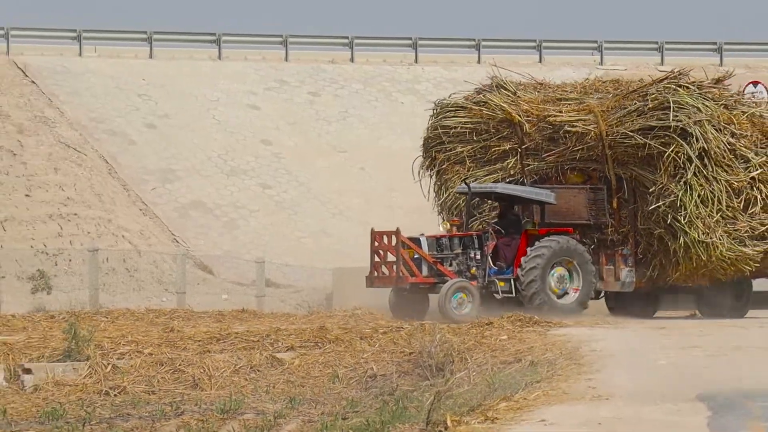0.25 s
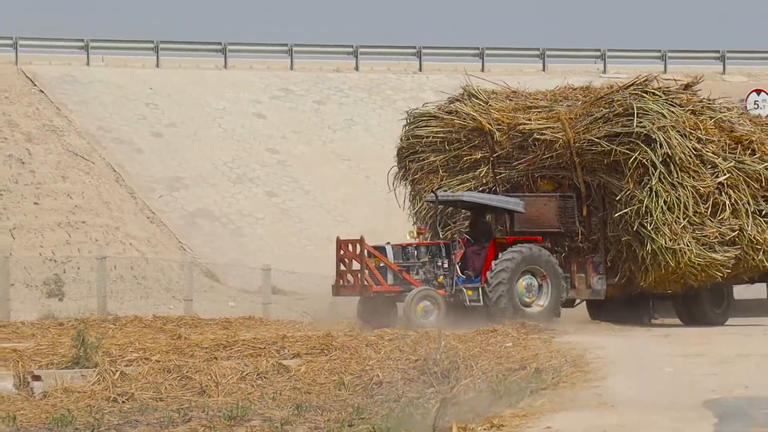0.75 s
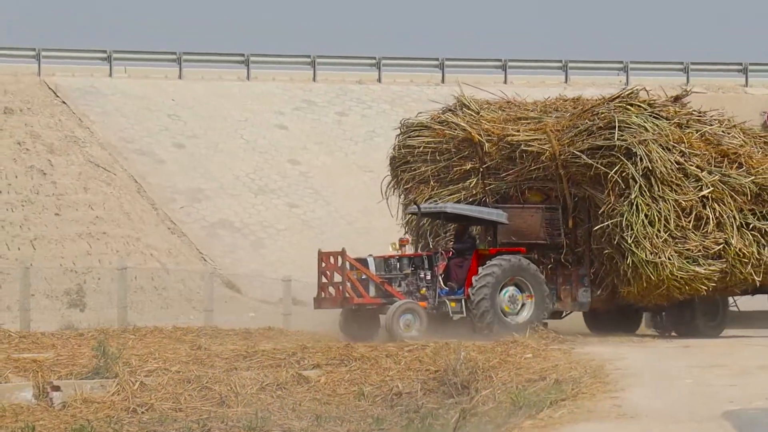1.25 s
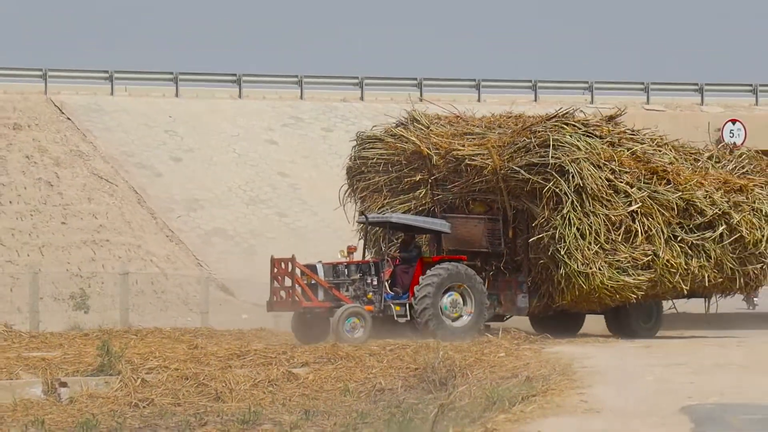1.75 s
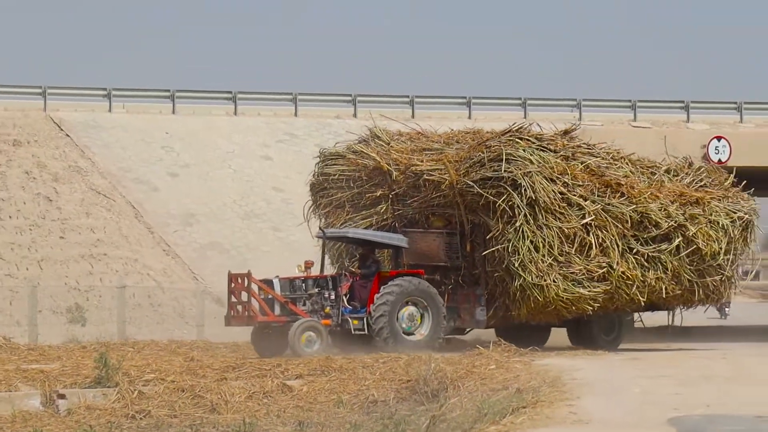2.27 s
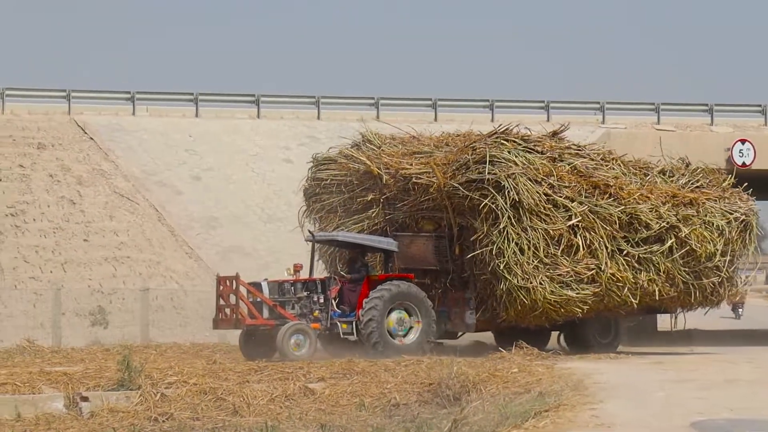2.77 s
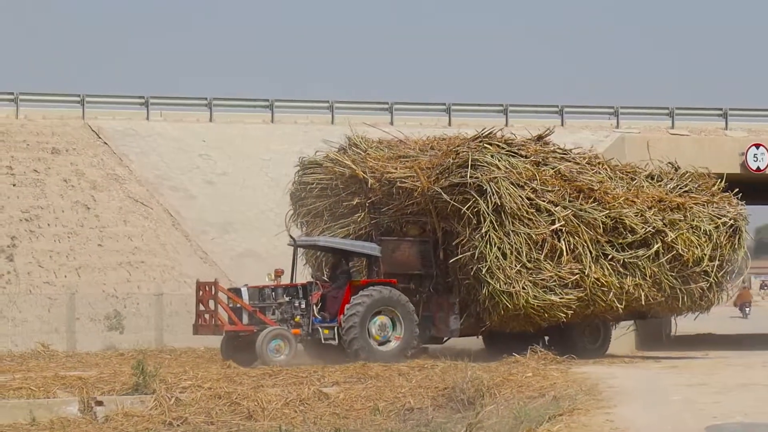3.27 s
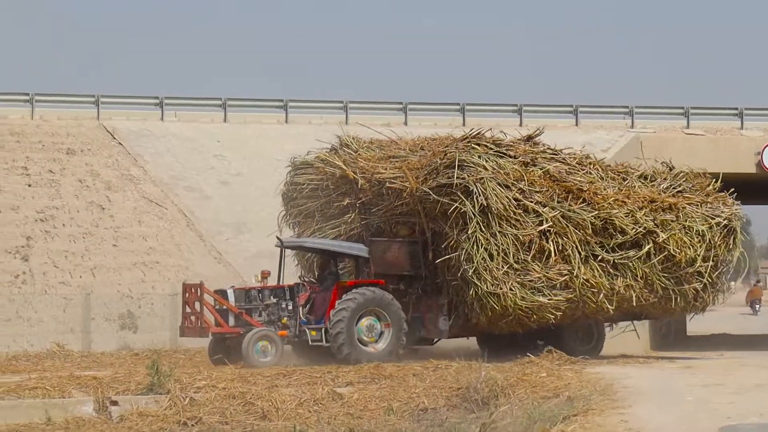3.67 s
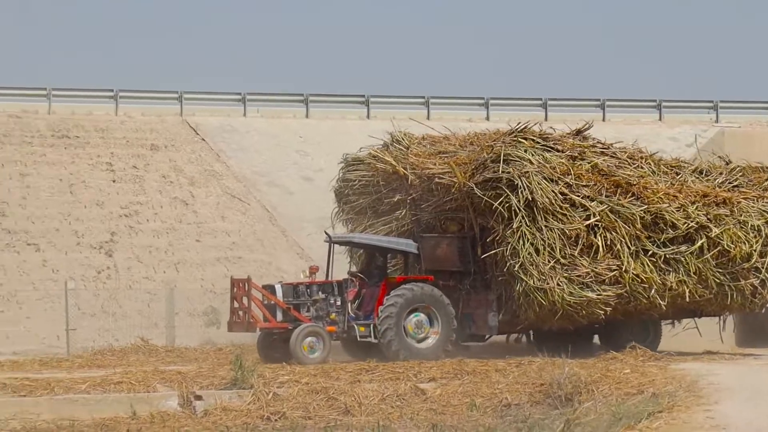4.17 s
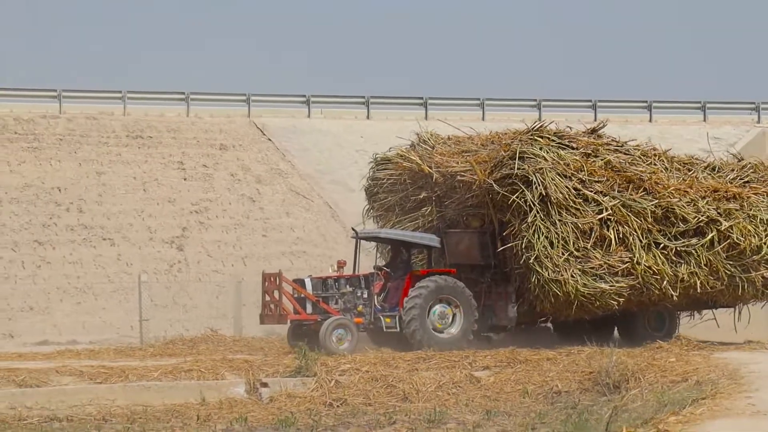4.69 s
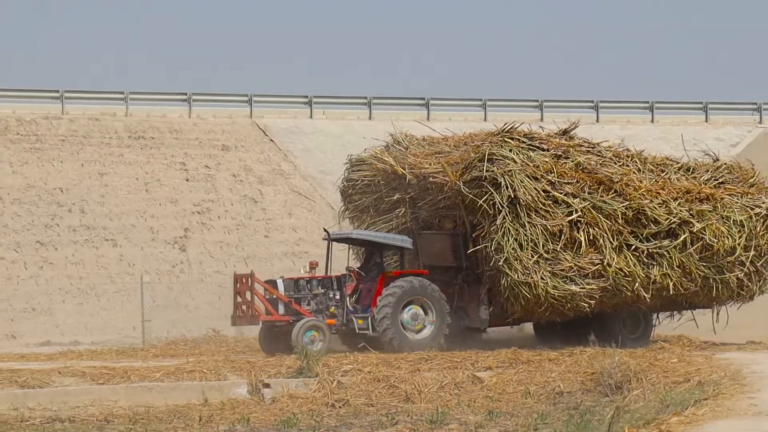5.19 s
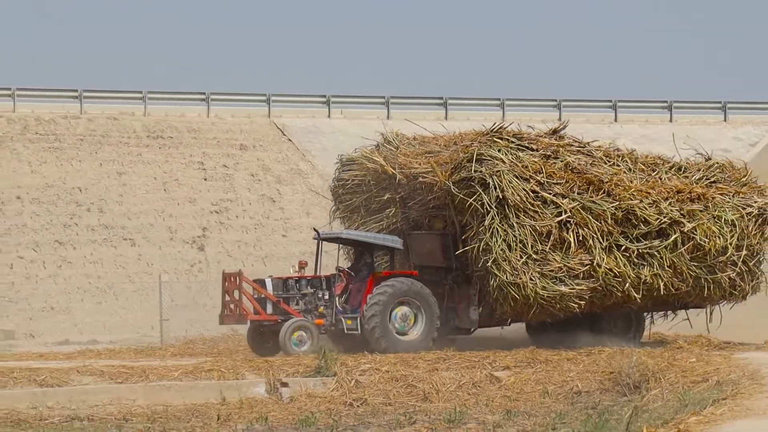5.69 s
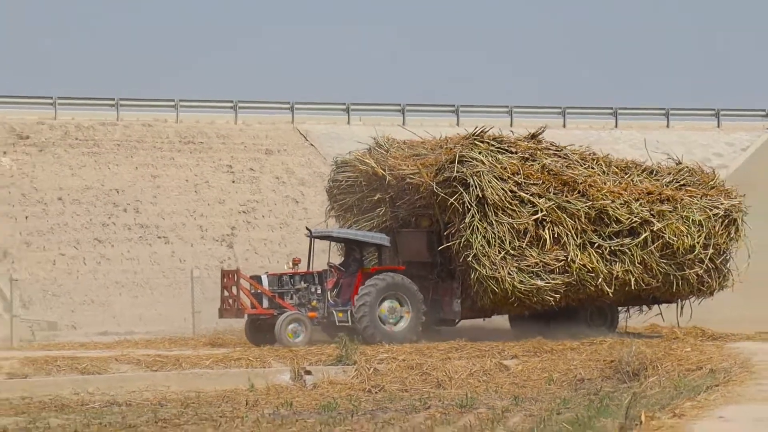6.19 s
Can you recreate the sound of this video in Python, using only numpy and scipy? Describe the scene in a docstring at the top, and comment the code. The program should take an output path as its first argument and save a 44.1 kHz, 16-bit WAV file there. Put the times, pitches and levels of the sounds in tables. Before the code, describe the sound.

An open dirt road beside an embankment, heard through a close stereo microphone battered by wind. From the start a diesel tractor under load chugs at a distance: quick, slightly uneven, muffled pulses with a short slap of echo and a low roll beneath. Hard metallic clacks from its engine fade within the first second. Low wind flutters constantly, with blunt thuds and slaps, strongest near 0.4, 1.1, 2.1, 3.2, 3.9, 4.6 and 5.1 seconds; some crack with overload and duck everything. The wind lulls briefly around 3. From about 3.3 a small motorbike emerges, its bright chain hiss and clatter swelling to a very close pass near 4.3, with snapping grit, tyre swish and sharp metallic ticks. It recedes with a low, rapid exhaust putter and ringing valve ticks, which grow after 5.4 as the throttle opens. Faint, dry airy hiss remains behind; the tractor keeps chugging to the end, about 6.4.

```python
"""A dirt road below an embankment, where a diesel tractor hauling a loaded trolley is heard from a distance.
The tractor is uneven firing pulses and puffs with an echo, ringing clacks and a low roll of noise.
A small single-cylinder engine, likely a motorbike, hisses close by after four seconds and putters away:
beamed noise layers that pass, exhaust puffs, ringing valves, gritty tyres and short metallic ticks.
Wind flutters and slaps on the microphone as noise and short eddies, and its limiter ducks; far off, dry air hisses."""
import sys
import numpy as np
from scipy import signal
from scipy.fft import rfft, irfft
from scipy.io import wavfile
from scipy.ndimage import uniform_filter1d, minimum_filter1d

SR = 44100
rng = np.random.default_rng(int(sys.argv[2]) if len(sys.argv) > 2 else 0)


def transcribe(u):
    """Save the signal u as a 16-bit wav file named by the first command-line argument.

    u: samples, shape (n,) or (channels, n), limited to [-1, 1]; the rate is SR.
    q: integer samples, one column per channel.
    """
    v = np.clip(np.atleast_2d(u).T, -1, 1)
    q = np.round(v * 32767).astype(np.int16)
    wavfile.write(sys.argv[1], SR, q)


N = 284268
TIME = np.arange(N) / SR  # s
EDDY_TIME = np.arange(-256, 257) / SR  # s, zero at the middle of an eddy

TRACTOR_FIRING_HZ = 58.22
# The motorbike's pass: when it is nearest, how near, and how fast.
PASS_S, NEAREST_M, SPEED_M_PER_S = 4.287, 1.8, 6.3

# Flurries of eddies at the microphone.
# Each row: start in seconds, length in seconds, relative level in dB, centre in Hz.
FLURRIES = [(0.029, 0.061, -17.5, 690), (0.209, 0.019, -17.5, 850), (0.351, 0.0049, -16.5, 830),
            (0.394, 0.028, -14, 1000), (0.43, 0.057, -22, 860), (0.61, 0.017, -22, 960),
            (0.628, 0.027, -14, 820), (0.726, 0.051, -18, 490), (0.773, 0.019, -15, 970),
            (0.861, 0.0055, -21.5, 800), (1, 0.018, -21, 620), (1.061, 0.036, -16, 990),
            (1.112, 0.018, -12, 720), (1.143, 0.023, -16.5, 770), (1.172, 0.0082, -7.5, 1030),
            (1.218, 0.021, -15.5, 890), (1.271, 0.015, -13, 930), (1.341, 0.022, -21.5, 820),
            (1.426, 0.027, -17, 1060), (1.574, 0.029, -19.5, 830), (1.813, 0.0094, -14.5, 1010),
            (1.923, 0.021, -15.5, 890), (2.013, 0.0048, -15.5, 920), (2.089, 0.0078, -16.5, 1060),
            (2.118, 0.029, -15.5, 945), (2.197, 0.0046, -15, 850), (2.29, 0.017, -16, 1040),
            (2.336, 0.038, -23.5, 700), (2.546, 0.013, -18.5, 600), (2.627, 0.033, -18, 660),
            (2.92, 0.017, -24, 760), (2.952, 0.021, -20.5, 790), (3.201, 0.02, -15.5, 760),
            (3.233, 0.0048, -10, 810), (3.342, 0.015, -17.5, 710), (3.39, 0.0054, -19.5, 900),
            (3.447, 0.0082, -16, 670), (3.592, 0.0052, -18.5, 736), (3.611, 0.0064, -17.5, 824),
            (3.694, 0.0066, -21, 800), (3.919, 0.034, -14, 1040), (4.07, 0.006, -39, 790),
            (4.199, 0.031, -26.5, 710), (4.238, 0.032, -17, 764), (4.355, 0.017, -16.5, 810),
            (4.46, 0.033, -20, 910), (4.524, 0.012, -17, 830), (4.551, 0.01, -13.5, 1200),
            (4.565, 0.021, -14, 1010), (4.6, 0.033, -19, 724), (4.62, 0.038, -13, 1100),
            (4.697, 0.0071, -16.5, 880), (4.724, 0.023, -20.5, 960), (4.82, 0.0047, -22, 1230),
            (5.041, 0.074, -18.5, 760), (5.549, 0.0082, -19, 620), (5.804, 0.014, -12, 540),
            (5.86, 0.028, -17, 670), (6.017, 0.031, -23.5, 850), (6.244, 0.018, -18, 570),
            (6.316, 0.0049, -17, 764), (6.398, 0.02, -14, 664)]
# The steady wind, with a lull near three seconds. Each row: time in seconds, relative level in dB.
STEADY_WIND = [(0, -29.5), (0.55, -36.5), (0.8, -31), (1.3, -27), (1.85, -25.5), (2.15, -31.5),
               (2.55, -26.5), (2.98, -32.5), (3.07, -47), (3.28, -25.5), (3.75, -36.5), (4.0, -23),
               (4.65, -24), (4.92, -28), (5.2, -23), (5.85, -24), (6.45, -26.5)]


def tractor(level_db=-37, rough=0.54, knock_s=0.0039, echo_db=-5, echo_s=.047):
    """Four uneven cylinders fire a pulse and a puff each; the embankment throws them back."""
    # Exhaust and block. Each row: frequency in Hz, relative density in dB per Hz.
    spectrum = [(30, -37), (60, -14), (110, 0.5), (350, -6.5), (520, -4.5), (800, -11.5), (1150, -13.5),
                (1370, -7.5), (1600, -15), (2200, -23.5), (2700, -18.5), (4500, -30.5), (8000, -39.5),
                (14000, -70)]
    firings = np.cumsum(TRACTOR_FIRING_HZ * (1 + .008 * wander(2))) / SR
    cylinder = gain_of(np.array([4.0, -1.5, 3.5, -2.0]))[firings.astype(int) % 4]
    pulses = np.diff(np.floor(firings), prepend=0) * cylinder * gain_of(0.51 * wander(40))
    age_s = (firings % 1) / TRACTOR_FIRING_HZ
    puffs = noise() * cylinder * (0.4 + np.exp(-age_s / knock_s))
    # hood and load smear each pulse
    scatter = rng.standard_normal(900) * np.exp(-np.arange(900) / 260)
    pulses = signal.oaconvolve(pulses, scatter)[:N]
    direct = coloured((1 - rough) * evened(pulses) + rough * evened(puffs), spectrum)
    echo = gain_of(echo_db) * np.roll(direct, round(echo_s * SR), 1)
    return gain_of(level_db + wander(0.33)) * evened(direct + echo)


def knock(weak_db=-15, decay_s=0.0021, uneven_db=2):
    """Injection clacks ring the engine block, strong and weak by turns."""
    # The clack fades as the tractor turns side on. Each row: time in seconds, level in dB.
    level_rows = [(0, -44), (.11, -42.5), (.2, -39.5), (.29, -41), (.35, -53), (.55, -46), (.66, -39.5),
                  (.72, -42), (.85, -59), (3, -61), (6.45, -74)]
    # Ring of the block. Each row: frequency in Hz, relative level in dB, time to fall 60 dB in seconds.
    modes = [(836, -17, .02), (1380, 2.5, 0.012), (1920, 5, 0.012), (2200, 5.5, 0.0097), (2810, -1, .022),
             (3100, -6, 0.033), (3500, -7, 0.038), (3750, -4, 0.025), (5100, -21, 0.0052),
             (6250, -10, 0.0031)]
    firings = TRACTOR_FIRING_HZ * TIME + 1.25 + .05 * wander(20)
    age_s = (firings % 1) / TRACTOR_FIRING_HZ
    blow_db = weak_db * (firings.astype(int) % 2) + uneven_db * wander(25)
    blows = np.exp(-age_s / decay_s) * gain_of(blow_db)
    tone = [(4000, -4), (7000, -2), (10000, -18), (15000, -40)]
    return gain_of(curve(level_rows)) * coloured(rung(noise() * blows, modes), tone)


def rumble(level_db=-51):
    """The low, even roll of the tractor and its load, as shaped noise."""
    spectrum = [(20, -18), (42, -6), (65, -6), (100, -3), (200, -19), (1000, -69)]
    return gain_of(level_db) * coloured(noise(), spectrum)


def motorbike(rattle_db=1.5, uneven_db=1.3, aside_db=2, near_db=4, stones_db=3):
    """Every firing gives an exhaust puff and a valve tick, and jerks the hissing chain."""
    # Each row: time in seconds, firing rate in Hz.
    rate_rows = [(0, 29), (2.6, 28.6), (3.3, 27.6), (3.8, 26.6), (4.3, 25.2), (4.8, 24.6), (5.3, 24.4),
                 (5.8, 24.6), (6.1, 25), (6.45, 25)]
    rate_hz = curve(rate_rows)
    cycles = np.cumsum(rate_hz) / SR + .09
    age_s = (cycles % 1) / rate_hz
    strength = gain_of(uneven_db * wander(4.9))
    exhaust = muffler(cycles, age_s, strength)
    hiss = chain(cycles)
    # Clatter of the engine. Each row: frequency in Hz, relative density in dB per Hz.
    clatter_spectrum = [(600, 12), (1600, 5), (2800, 8.5), (3700, 3.5), (4600, -14), (6400, -7.5),
                        (8000, -24), (9500, -18.5), (12000, -34), (15000, -44)]
    clatter = coloured(noise() * gain_of(rattle_db * wander(73)), clatter_spectrum)
    clatter = passing(level_db=-35, aim_deg=22, beam_deg=190) * clatter
    taps = noise() * np.exp(-age_s / .0011) * strength
    rattle = ports(clatter + valves(taps), side_db=aside_db)
    # passing to one side, it differs more between the ports, most of all when nearest
    nearness = NEAREST_M / np.hypot(NEAREST_M, SPEED_M_PER_S * (PASS_S - TIME))
    rattle = rattle + (gain_of(near_db * nearness) - 1) * (rattle - rattle.mean(0))
    details = ports(gravel() + swish() + metallic_ticks(), side_db=stones_db)
    return ports(exhaust) + rattle + details + facing(ports(hiss, side_db=10.5))


def muffler(cycles, age_s, strength, puff_s=.0026):
    """Each firing sends a click and a dying puff of noise through the exhaust."""
    # The exhaust points backwards and comes up as the motorbike goes by.
    # Each row: time in seconds, level in dB.
    level_rows = [(0, -82), (3.3, -43.5), (4.1, -29), (4.6, -33), (5, -37.5), (5.4, -32), (5.75, -28),
                  (6.1, -28.5), (6.45, -25)]
    # Each row: frequency in Hz, relative density in dB per Hz.
    spectrum = [(40, -22), (120, -12), (300, 7), (480, 0), (720, 5), (1000, -4.5), (1500, -13), (2400, -12),
                (3500, -34), (7000, -76), (15000, -80)]
    puffs = evened(noise() * (0.09 + np.exp(-age_s / puff_s)) * strength)
    fired = np.diff(np.floor(cycles), prepend=0) * strength
    return gain_of(curve(level_rows)) * coloured(puffs + 0.34 * evened(fired), spectrum)


def chain(cycles, shade_s=4.19, shade_fade_s=.08, shade_db=-6):
    """The chain hisses in time with the firing; the body hides it as it draws level."""
    # Each row: frequency in Hz, relative density in dB per Hz.
    spectrum = [(2000, -22), (4000, 7.5), (7500, -16), (9200, -3), (10400, 1), (11800, 1), (13200, -8),
                (14300, -13), (16000, -40)]
    throb = gain_of(3.2 * np.cos(2 * np.pi * (cycles - .7)) + wander(90))
    hidden_db = shade_db * np.clip((TIME - shade_s) / shade_fade_s, 0, 1)
    level = passing(level_db=-53, aim_deg=34, beam_deg=59) * gain_of(hidden_db + 2.2 * wander(10))
    return level * coloured(noise() * throb, spectrum)


def valves(taps, vary_db=3.5, dull_db_per_octave=7, dull_from_hz=2300, dull_s=5.37, dull_fade_s=.2):
    """Each tap rings the modes in a slowly varying mixture; the high ones fade as the engine draws away."""
    # Valve ring. Each row: frequency in Hz, relative level in dB, time to fall 60 dB in seconds.
    modes = [(1460, 17.5, 0.031), (2284, 11, 0.029), (3620, 4.5, 0.049), (3960, 9, 0.039),
             (4980, -4.5, 0.023), (6900, -13, .016)]
    # The ticks come out once the engine's side and back face the microphone.
    # Each row: time in seconds, level in dB.
    level_rows = [(0, -67), (3.4, -58), (4.4, -64), (4.95, -55), (5.5, -45), (5.7, -49.5), (6.05, -47),
                  (6.45, -44)]
    gone, rings = np.clip((TIME - dull_s) / dull_fade_s, 0, 1), 0
    for hz, db, t60 in modes:
        dull_db = dull_db_per_octave * max(np.log2(hz / dull_from_hz), 0) * gone
        mode_gain = gain_of(db + vary_db * wander(8.4) - dull_db)
        rings = rings + mode_gain * rung(taps, [(hz, db, t60)])
    return gain_of(curve(level_rows)) * coloured(rings, [(5000, 18), (8000, -15), (14000, -30)])


def gravel(grains_per_s=130, spread_db=4, grain_s=0.0092):
    """Larger stones snap one by one; fine ones crackle under the tyres as they pass."""
    # Grit snapping under the tyres. Each row: time in seconds, level in dB.
    snap_rows = [(3.7, -33), (3.812, -34.5), (3.863, -42), (4.062, -29), (4.08, -34), (4.199, -29),
                 (4.219, -29), (4.237, -30), (4.254, -30), (4.298, -29), (4.367, -42), (4.41, -32),
                 (4.44, -29.5), (4.521, -35), (4.862, -50)]
    colour = [(800, 7), (3000, 12.5), (6000, -4.5), (8000, -15.5), (10000, 1), (13000, -8), (15000, -38)]
    grain_gain = gain_of(spread_db * np.minimum(rng.exponential(1, N), 3))
    grains = (rng.random(N) < grains_per_s / SR) * grain_gain
    bursts = signal.lfilter([1], [1, -np.exp(-1 / (grain_s * SR))], grains)
    crackle = passing(level_db=-43, aim_deg=103, beam_deg=110) * coloured(noise() * bursts, colour)
    return snaps(snap_rows, 0.0065, colour) + crackle


def swish(width_hz=3000, uneven_db=3.5):
    """Tyres on dust: an uneven hiss whose centre sinks as they pass."""
    # Each row: time in seconds, centre in Hz, level in dB.
    swish_rows = [(0, 10400, -85), (3, 10400, -72), (3.6, 9000, -66), (3.95, 8200, -56), (4.2, 7600, -53),
                  (4.45, 5200, -52), (4.62, 4800, -56), (4.9, 5200, -57), (5.08, 5200, -68),
                  (6.45, 5000, -76)]
    s, hz, db = np.transpose(swish_rows)
    centre_hz, sound = np.interp(TIME, s, hz), noise()
    for _ in range(3):
        sound = resonate(sound, centre_hz, width_hz)
    return gain_of(np.interp(TIME, s, db) + uneven_db * wander(22)) * evened(sound)


def metallic_ticks(ring_s=0.022, chatter_s=0.0029, contact_db=-7):
    """Short metallic ticks: a brief burst of noise excites a ring at one pitch."""
    # A loose part rattling at first; the last few are single louder valve ticks of the engine.
    # Each row: time in seconds, peak level in dB, pitch in Hz.
    tick_rows = [(3.511, -30, 3900), (3.811, -25, 3800), (4.058, -33, 2750), (4.296, -25, 2800),
                 (4.353, -21, 2830), (4.442, -29, 2830), (4.914, -36, 3480), (4.978, -32.5, 3580),
                 (5.192, -25, 2030), (5.429, -35, 3760)]
    contact_spectrum = [(800, 2), (3500, 23), (7000, -32), (14000, -47)]
    out, t = np.zeros((2, N)), np.arange(2048) / SR
    for s, db, hz in tick_rows:
        chatter = noise(size=len(t)) * np.exp(-t / chatter_s)
        ring = gain_of(-60 * t / ring_s) * np.sin(2 * np.pi * hz * t)
        tone = signal.oaconvolve(chatter, ring[None], axes=1)[:, :len(t)]
        tick = evened(tone) + gain_of(contact_db) * coloured(chatter, contact_spectrum)
        add(out, s, gain_of(db) * tick / abs(tick).max())
    return out


def passing(level_db, aim_deg, beam_deg, throttle_s=5.4, throttle_db_per_s=13):
    """Amplitude of a passing part: one over distance, its beam (12 dB less at beam_deg off aim), the throttle."""
    ahead_m = SPEED_M_PER_S * (PASS_S - TIME)
    # the aim counts from straight ahead
    off_aim = (np.degrees(np.arctan2(NEAREST_M, ahead_m)) - aim_deg) / beam_deg
    beam_db = -12 * off_aim ** 2
    # once past, the rider opens the throttle
    throttle_db = throttle_db_per_s * np.maximum(TIME - throttle_s, 0)
    return gain_of(level_db + beam_db + throttle_db) * NEAREST_M / np.hypot(NEAREST_M, ahead_m)


def facing(stereo):
    """As the hiss meets the two ports more or less squarely, their sum changes and their difference stays."""
    # Each row: time in seconds, gain of the sum in dB.
    sum_rows = [(0, 19), (2.5, 5), (3.5, -6.5), (3.75, -30), (3.9, 5), (4.4, 28), (4.6, 14), (5.2, -7),
                (6.45, 8)]
    return stereo + (gain_of(curve(sum_rows)) - 1) * stereo.mean(0)


def slaps(level_db=-4.5, slap_cycles=.8):
    """Single hard eddies slap the microphone; some overload it with a crack."""
    # Each row: time in seconds, relative level in dB, centre in Hz.
    slap_rows = [(0.0265, 2, 880), (0.359, 1.5, 676), (0.367, 2, 635), (0.3897, 0.5, 744),
                 (0.4082, 6.5, 915), (0.4383, 5, 830), (0.6135, -4, 1030), (0.636, -12.5, 2200),
                 (0.6384, 4, 1110), (0.6434, 7, 890), (0.692, -9, 920), (0.781, -11, 1410),
                 (0.785, -5, 846), (1.054, 1.5, 666), (1.0626, -1, 520), (1.0725, -1.5, 1300),
                 (1.078, 7.5, 1180), (1.0868, 10.5, 840), (1.1134, 5, 596), (1.1272, 0, 1200),
                 (1.1752, -7, 1370), (1.2205, 0, 1100), (1.233, 3, 1150), (1.282, -10, 1100),
                 (1.428, -10, 846), (1.4325, 1, 930), (1.4385, -2.5, 1540), (1.4415, 7, 1140),
                 (1.4515, 1.5, 640), (1.4915, -9, 960), (1.585, -6, 850), (1.5945, -7.5, 1480),
                 (1.8165, -5, 1090), (1.933, 0, 740), (2.0143, 0, 930), (2.0922, -2, 1090),
                 (2.1223, 1, 1160), (2.1325, 1.5, 617), (2.136, 3, 806), (2.1388, 8.5, 965),
                 (2.1715, -6.5, 940), (2.301, -12, 1850), (2.6259, -11.5, 1800), (2.631, -6, 910),
                 (2.6413, -7, 480), (2.652, -5.5, 1520), (2.656, -6, 700), (2.6962, -1, 830),
                 (2.7047, 6.5, 1190), (3.2388, 8.5, 800), (3.448, -7, 760), (3.5935, -5.5, 790),
                 (3.6135, -9, 970), (3.9248, 11, 1000), (4.215, -7, 1150), (4.2429, 6.5, 800),
                 (4.2523, -5, 650), (4.268, -5, 800), (4.367, 2.5, 940), (4.4656, 4, 890),
                 (4.527, -5, 1250), (4.557, 5, 1470), (4.568, 5, 840), (4.5717, 7, 990), (4.625, -2, 650),
                 (4.632, -1, 900), (4.6375, 8, 1330), (4.649, 8, 1080), (4.699, -4, 1300),
                 (4.728, 0.5, 1510), (4.7315, 2, 1290), (4.8253, 4, 1000), (5.0687, 9.5, 570),
                 (5.1425, -0.5, 650), (5.8142, -17, 420), (6.0227, -2.5, 1180), (6.044, -5, 1320),
                 (6.3197, -4.5, 625), (6.4016, 5.5, 392)]
    # Sharp cracks of overload. Each row: time in seconds, level in dB.
    crack_rows = [(0.4095, -10), (1.0787, -1.5), (1.1273, -16.5), (1.4407, -23), (1.8169, -21),
                  (2.1379, -24), (2.7046, -14), (4.557, -30), (4.5708, -7), (4.638, -20)]
    crack_spectrum = [(300, -29), (1500, 25.5), (3000, 6.5), (6000, -4.5), (10000, -25.5), (16000, -43)]
    out = np.zeros((2, N))
    for s, db, hz in slap_rows:
        add(out, s + EDDY_TIME[0], gain_of(db + level_db) * eddy(hz, slap_cycles))
    return out + snaps(crack_rows, 0.0012, crack_spectrum)


def buffets(gap_s=.0023, cycles=.75, spread_db=4, spread_octaves=0.55, octaves_per_db=0.0867,
            churn=1.0, churn_pitch=0.5):
    """A flurry is a dense run of eddies of mixed size and pitch, the stronger tending higher, over a deeper churn."""
    out, size = np.zeros((2, N)), 4096
    hz, t = np.fft.rfftfreq(size, 1 / SR), np.arange(size) / SR - .01
    for s, length, db, centre in list(FLURRIES) + small_flurries():
        outside = np.maximum(abs(t - length / 2) - 0.4 * length, 0)
        shape = np.exp(-outside / (0.00024 + 0.085 * length))
        run = np.zeros((2, size))
        for k, (delay, strength, pitch) in enumerate(rng.uniform(-0.988, 1, size=(34, 3))):
            at = (k + .5 + delay / 2) * gap_s
            eddy_db = spread_db * strength
            octaves = spread_octaves * pitch + octaves_per_db * eddy_db
            swing = eddy(centre * 2 ** octaves, cycles)
            add(run, at + EDDY_TIME[0] - t[0], gain_of(eddy_db) * np.interp(at, t, shape) * swing)
        deep = irfft(rfft(noise(size=size) * shape) * flurry_colour(hz, churn_pitch * centre))
        flurry = evened(run) + churn * evened(deep)
        # a longer flurry carries more energy
        flurry *= np.sqrt(length * SR / np.sum(flurry ** 2, axis=1, keepdims=True))
        add(out, s + t[0], gain_of(db) * flurry)
    return out


def small_flurries(per_s=5, length_s=0.01, over_db=3, spread_db=2, centre_hz=640):
    """Chance flurries a little above the breeze, as rows like those of the flurry table."""
    slot_s = .05
    slots = np.arange(0, N / SR, slot_s)
    chance, delay, length, strength = rng.random((len(slots), 4)).T
    db = np.interp(slots, *np.transpose(STEADY_WIND)) + over_db + spread_db * (2 * strength - 1)
    start_s, pitch_hz = slots + delay * slot_s, centre_hz * 2 ** (strength - .5)
    rows = np.column_stack([start_s, length_s * (.5 + length), db, pitch_hz])
    return list(rows[chance < per_s * slot_s])


def flurry_colour(hz, centre, corner=0.88, low_corner=0.44, steepness=2.7):
    """A broad hump around the centre that falls steeply into the treble."""
    rise = hz / np.hypot(hz, low_corner * centre)
    fall = np.hypot(1, (hz / (corner * centre)) ** steepness)
    return rise / fall / (1 + (hz / 4800) ** 4)


def eddy(hz, cycles, overtone_db=-17.0):
    """One eddy swings the pressure briefly, with two overtones on its cosine."""
    t = EDDY_TIME
    swing = 0
    for k, phase in enumerate(rng.random((3, 2, 1))):
        swing = swing + gain_of(k * overtone_db) * np.cos(2 * np.pi * ((k + 1) * hz * t + phase))
    return swing / np.cosh(2 * hz * t / cycles)


def breeze(flutter_db=3.0, flutter_hz=35, edge_db=-14, edge_flutter_db=6, level_db=-1, drift_db=0.45):
    """Turbulence at the ports; its stronger moments are also brighter."""
    # The wind's flutter. Each row: frequency in Hz, relative density in dB per Hz.
    body_spectrum = [(20, -41), (45, -27), (80, -14), (130, -5), (250, 1), (420, 2), (700, -5),
                     (1000, -12.5), (1500, -20), (2500, -33), (5000, -75), (12000, -84)]
    edge_spectrum = [(150, -33), (500, 8.0), (900, -1), (1600, -20), (2800, -41), (6000, -64), (14000, -70)]
    eddies = np.clip(wander(flutter_hz), -2.5, 2.3)
    body = coloured(noise() * gain_of(flutter_db * eddies), body_spectrum)
    edge = coloured(noise() * gain_of(edge_flutter_db * eddies), edge_spectrum)
    return wind_level() * gain_of(level_db + drift_db * wander(29)) * (body + gain_of(edge_db) * edge)


def wind_level(swell_db=-3.5, rise_s=0.017, fall_s=0.036):
    """Amplitude of the wind: the steady breeze and a swell under each listed flurry, more for a long one."""
    power = gain_of(curve(STEADY_WIND)) ** 2
    for s, length, db, _ in FLURRIES:
        outside = np.maximum(s - TIME, 0) / rise_s + np.maximum(TIME - s - length, 0) / fall_s
        swell = gain_of(db + swell_db) * np.exp(-np.minimum(outside, 20))
        power = power + length / fall_s * swell ** 2
    return np.sqrt(power)


def air(level_db=-47.5, rustle_db=2.5):
    """A far hiss with a fine dry rustle in it, as unevenly shaken noise."""
    # Distant road and dry leaves. Each row: frequency in Hz, relative density in dB per Hz.
    spectrum = [(300, -2), (2000, 3), (3500, -3), (5500, -16), (8000, -20), (10500, -18.5), (12000, -23.5),
                (13500, -58), (15000, -53)]
    rustle = coloured(noise() * gain_of(rustle_db * wander(140)), spectrum)
    return gain_of(level_db + 0.57 * wander(5.0)) * rustle


def ports(pair, side_db=0, skew_s=.000011, low_cut_hz=75, likeness=.65):
    """Two close ports behind a wind filter: their difference lags the sum by about a quarter turn."""
    # The ports differ more towards the treble. Each row: frequency in Hz, side minus mid in dB before side_db.
    width = [(60, -50), (250, -62), (430, -30.5), (710, -21), (1200, -13.5), (2000, -7), (3100, -3),
             (5000, 6), (8300, 11.5), (13000, 5.5)]
    hz = np.fft.rfftfreq(N, 1 / SR)
    mid, other = rfft(pair) * hz / np.hypot(hz, low_cut_hz)
    turn = np.exp(-1j * (1.32 + 2 * np.pi * hz * skew_s))
    mixture = likeness * turn * mid + np.sqrt(1 - likeness ** 2) * other
    side = gain_of(read(width, hz) + side_db) * mixture
    return irfft(np.array([mid + side, mid - side]), N)


def snaps(rows, decay_s, spectrum):
    """Very short bursts of noise, one for each row of time in seconds and level in dB."""
    out, t = np.zeros((2, N)), np.arange(2048) / SR
    shape = np.exp(-t / decay_s) * (1 - np.exp(-t / 0.000067))
    for s, db in rows:
        burst = coloured(noise(size=len(t)), spectrum) * shape
        add(out, s - decay_s / 2, gain_of(db) * burst)
    return out


def rung(x, modes):
    """Rings a set of decaying sine modes; rms one."""
    t = np.arange(2048) / SR
    ring = sum(gain_of(db - 60 * t / t60) * np.sin(2 * np.pi * hz * t) for hz, db, t60 in modes)
    return evened(signal.oaconvolve(x, ring[None], axes=1)[:, :N])


def resonate(x, hz, width_hz):
    """A resonance of gain one that follows a pitch curve, by shifting the pitch to zero and back."""
    turn = np.exp(2j * np.pi * np.cumsum(hz) / SR)
    r = np.exp(-np.pi * width_hz / SR)
    return 2 * (turn * signal.lfilter([1 - r], [1, -r], x / turn)).real


def gain_of(db):
    """Decibels to amplitude."""
    return 10 ** (np.asarray(db) / 20)


def evened(x):
    """Scales to an rms of one."""
    return x / np.sqrt(np.mean(x ** 2) + 1e-20)


def curve(rows):
    """Values over time from rows of time in seconds and value."""
    return np.interp(TIME, *np.transpose(rows))


def read(points, hz):
    """A spectrum table on a log-frequency axis."""
    f, value = np.transpose(points)
    return np.interp(np.log(hz + 1), np.log(f + 1), value)


def coloured(x, points):
    """Filters by rows of frequency in Hz and dB; rms one."""
    size = x.shape[-1]
    filter_gain = gain_of(read(points, np.fft.rfftfreq(size, 1 / SR)))
    return evened(irfft(rfft(x) * filter_gain, size))


def wander(rate_hz):
    """Random motion of rms one, mostly below the given rate."""
    hz = np.fft.rfftfreq(N, 1 / SR)
    return evened(irfft(rfft(rng.standard_normal(N)) / (1 + (hz / rate_hz) ** 4), N))


def noise(size=N):
    """Two unrelated noises: the sound itself and the part that the ports do not share."""
    return rng.standard_normal((2, size))


def add(mix, s, sound):
    """Adds a sound at a time in seconds."""
    part = mix[:, max(round(s * SR), 0):][:, :sound.shape[1]]
    part += sound[:, :part.shape[1]]


def scene():
    """Engines, air and wind at the microphone."""
    ahead = ports(tractor() + knock(), side_db=-11.5)
    around = ports(rumble() + air() + breeze())
    gusts = ports(slaps() + buffets(), side_db=4.0, low_cut_hz=310)
    return ahead + around + motorbike() + gusts


def record(dry, recovery_db_per_s=18, edge_hz=15800):
    """A limiter ducks at the hardest slaps and recovers slowly; then a low-pass limits the band."""
    peak_db = 20 * np.log10(abs(dry.mean(0)) + 1e-6)
    fall_db = TIME * recovery_db_per_s
    over_db = np.maximum(np.maximum.accumulate(peak_db + fall_db) - fall_db, 0)
    ducked = dry / gain_of(uniform_filter1d(over_db, size=100))
    # a quick second stage rounds off the peaks that are left
    room = minimum_filter1d(1 / np.maximum(abs(ducked).max(0), 1), size=61)
    limited = ducked * uniform_filter1d(uniform_filter1d(room, size=31), size=31)
    low_pass = signal.firwin(511, edge_hz, window=("kaiser", 9), fs=SR)
    return signal.oaconvolve(limited, low_pass[None], "same")


dry = scene()
out = record(dry)
transcribe(out)
```